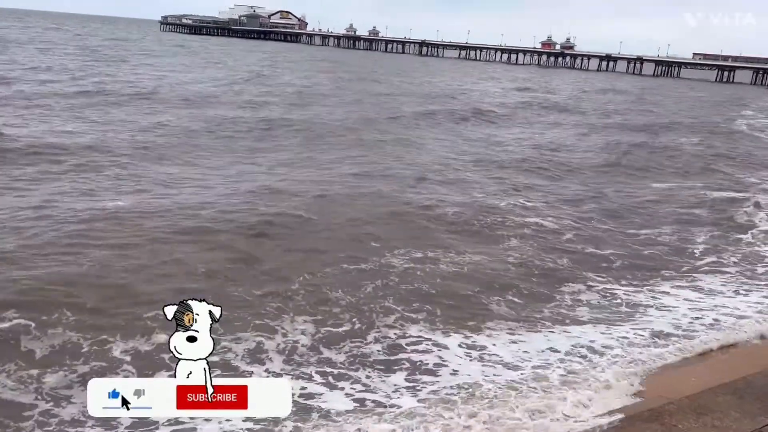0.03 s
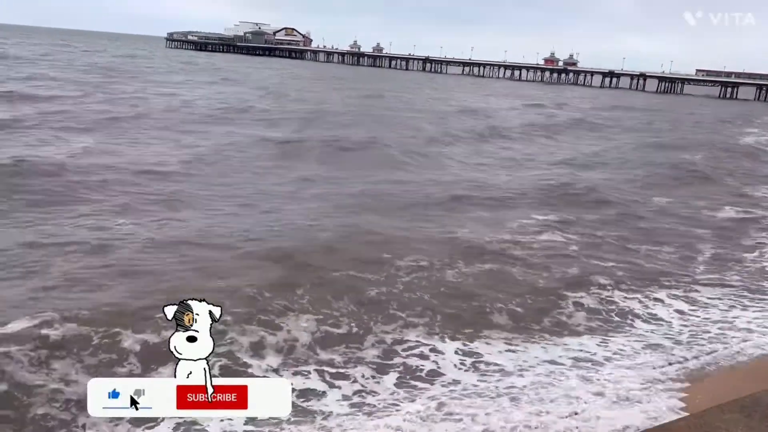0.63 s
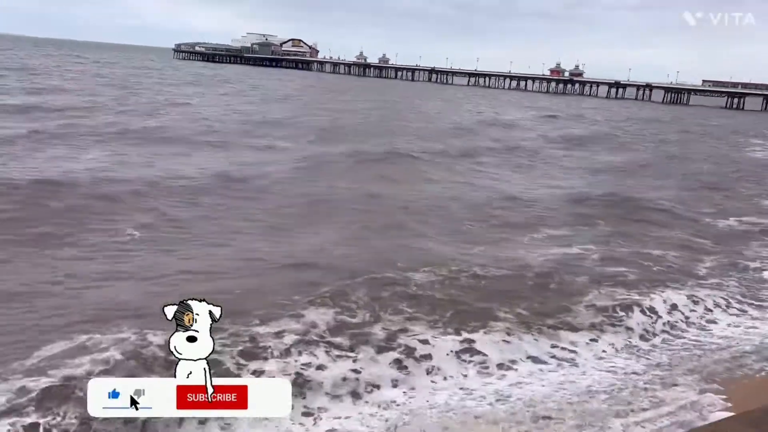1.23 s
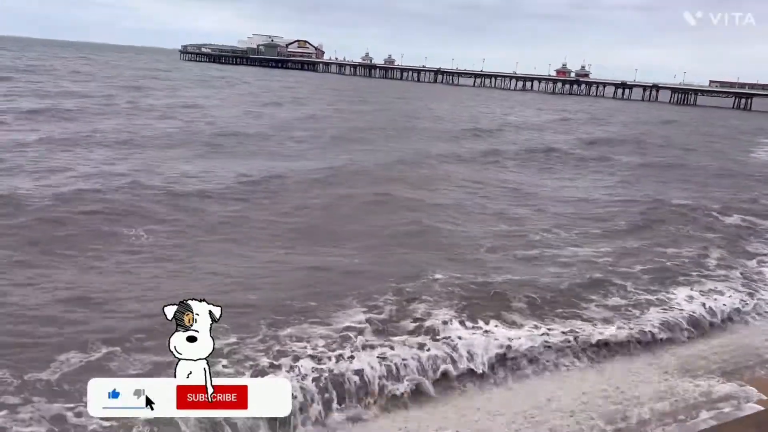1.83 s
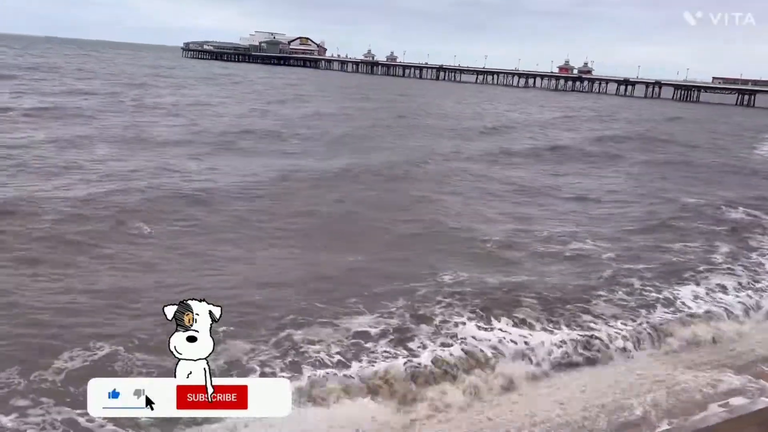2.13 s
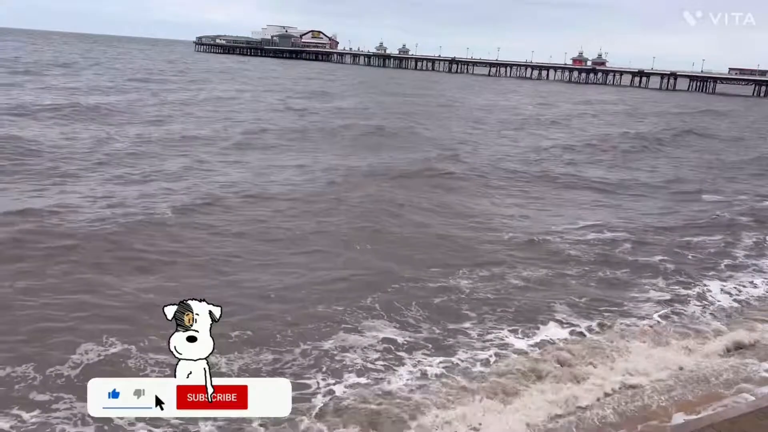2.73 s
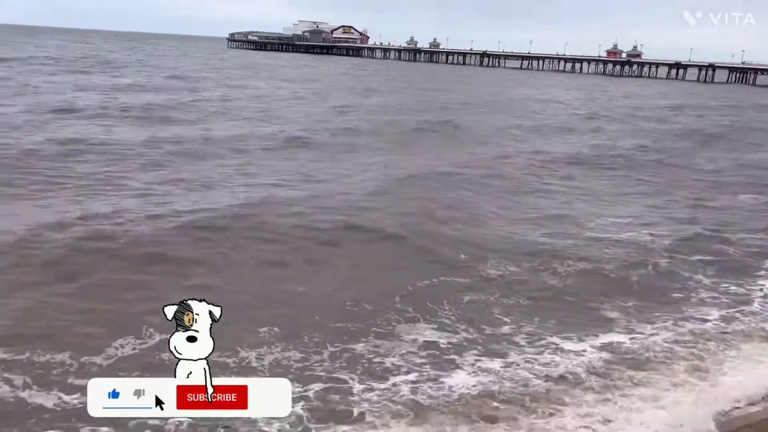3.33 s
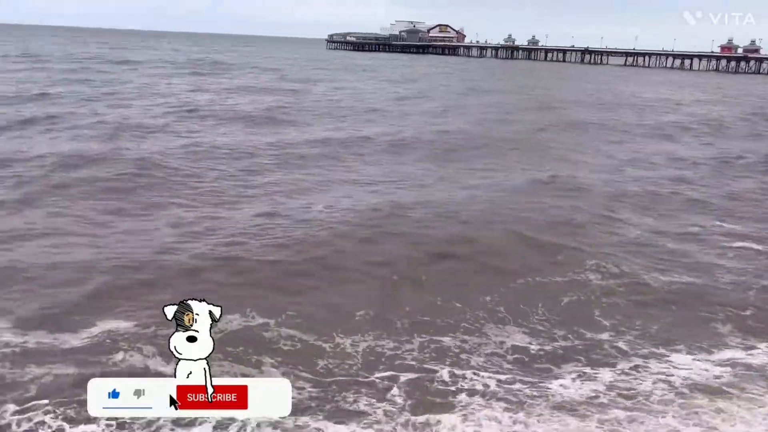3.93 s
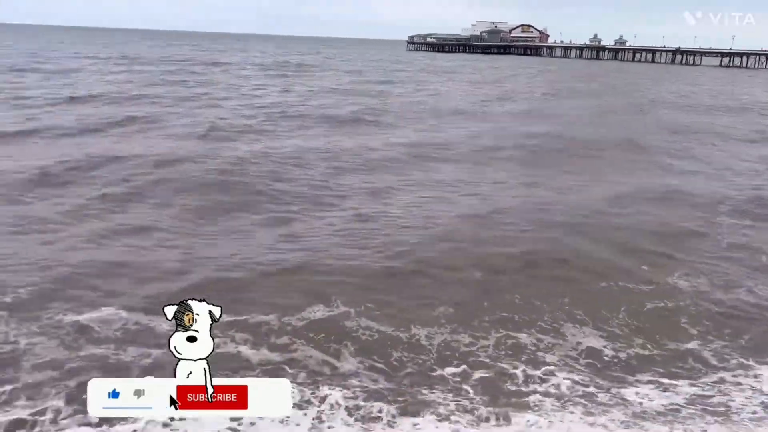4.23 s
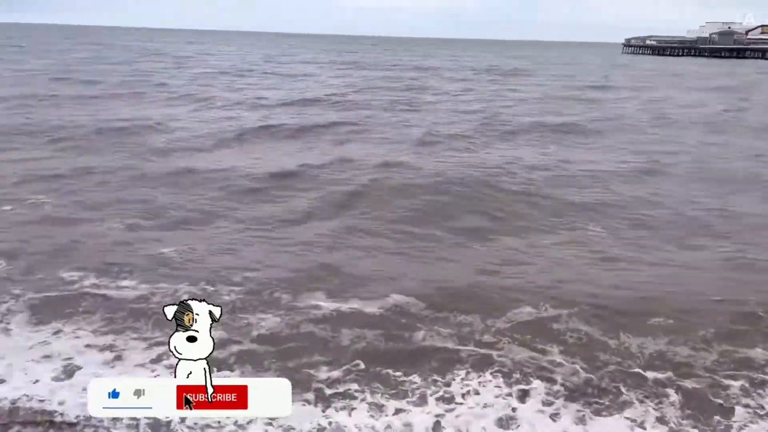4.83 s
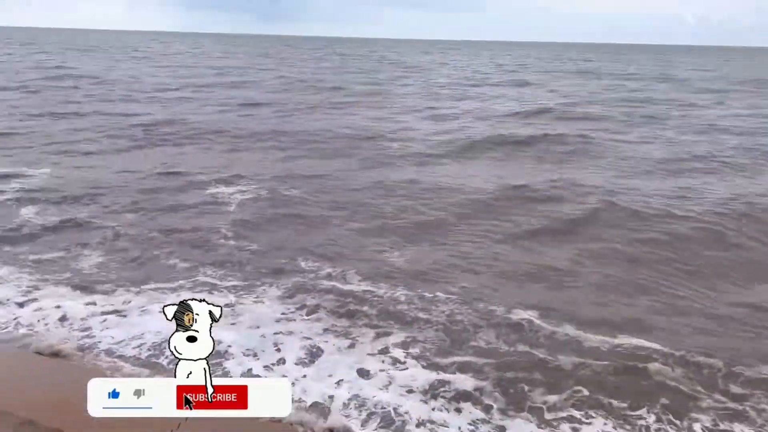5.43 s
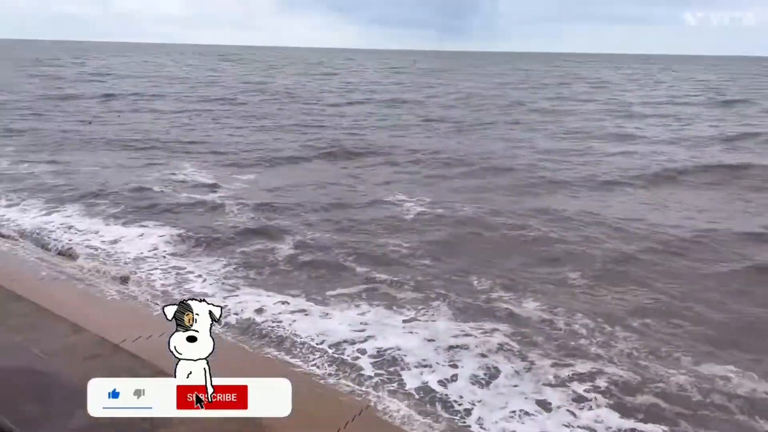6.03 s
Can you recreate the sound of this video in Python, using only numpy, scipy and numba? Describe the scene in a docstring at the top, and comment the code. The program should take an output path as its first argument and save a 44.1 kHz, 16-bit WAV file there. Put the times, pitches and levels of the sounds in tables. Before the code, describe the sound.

A small wave breaks, fizzes and drains on a sandy beach, then wind buffets the microphone hard.

```python
"""On a sandy beach, a small wave spills a few metres away, runs up as foam and drains; the next gathers.
Trapped air pockets gulp, small bubbles ring together as a wash, droplets patter and foam fizzes.
Spent water trickles back through the sand, and surf further off makes a steady rush.
Wind rumbles on a phone's microphones all along and buffets them hard once the wave is spent."""
import sys
import numpy as np
from scipy import signal
from scipy.fft import rfft, irfft, next_fast_len
from scipy.io import wavfile
from scipy.ndimage import uniform_filter1d, map_coordinates
from numba import njit

SR = 44100
rng = np.random.default_rng(int(sys.argv[2]) if len(sys.argv) > 2 else 0)


def wav_out(sig):
    """Save sig, one row per channel (or a flat mono array), as 16-bit PCM at SR to the path in sys.argv[1]."""
    wavfile.write(sys.argv[1], SR, np.round(np.clip(np.atleast_2d(sig).T, -1, 1) * 32767).astype(np.int16))


N = 267687

# Levels are relative. Pan is left minus right. A colour says how strong each pitch is.
# waves: break t/s, tumble/s, white water/dB, trapped air/dB, fizz/dB, spray/dB, starting fizz pan/dB
WAVES = [(-2, 1.3, -52, -25.5, -50, -45, 1), (1.1926, 1.3, -30, -24.5, -37, -41, 6),
         (4.5, 0.87, -37.5, -65, -46.5, -50.5, 1), (6, 1.2, -37.5, -30, -47.5, -43, -6)]
# the biggest air pockets: t/s, level/dB, starting f/Hz, length/s
GULPS = [(1.167, -10, 203, 0.035), (1.208, -18.5, 271.4, 0.24), (1.314, -19.5, 282, 0.14),
         (1.406, -8.5, 325, 0.02), (1.559, -16.5, 198, 0.071), (1.6, -6, 292, 0.022),
         (1.729, -14, 282, 0.099), (1.76, -6, 253, 0.039), (1.835, -16, 276, 0.064),
         (1.885, -15, 284, 0.071), (2.047, -15, 250.4, 0.11), (2.14, -11, 316, 0.017)]
# pitch of the main bubble size in the white water: t/s, f/Hz
BUBBLE_PITCH = [(0, 640), (.8, 610), (1.5, 1090), (2.3, 1690), (3.0, 1710), (3.6, 1190), (5.2, 1570),
                (5.65, 720), (6.07, 700)]
# tongues of water landing: t/s, level/dB, centre f/Hz, length/s
SPLASHES = [(1.889, -31, 1750, 0.062), (2.823, -37.5, 2100, 0.043), (3.281, -39, 1690, 0.042)]
# showers of droplets: t/s, hold/s, level/dB, fade/s
SPATTERS = [(1.85, 0.48, -39.5, .3), (2.83, .025, -45, .025), (3.28, 0.048, -45, .025),
            (5.21, .04, -56, .025)]
# water draining away: t/s, trickle/dB, hiss/dB, pan/dB
BACKWASH = [(0, -68, -80, 15), (3.0, -53.5, -60, 10), (3.65, -62, -59, 9), (4.1, -49.5, -51, 7),
            (5.0, -45.5, -51, 10), (5.4, -46, -52.5, 14), (6.07, -47, -55, 6)]
# gusts, large slow swirls of air: t/s, hold/s, level/dB, part unlike between the microphones/dB
GUSTS = [(0.115, 0.065, -33.5, -6), (.36, 0.22, -40, 3), (0.757, 0.027, -28.5, -1),
         (1.41, 0.033, -26.5, -8), (1.66, 0.08, -24.5, -9), (2.05, 0.35, -32, -11), (2.6, .2, -33, -1),
         (2.92, 0.25, -28.5, 1.5), (3.296, 0.044, -19, -6), (3.465, .1, -21, -5.5),
         (3.73, 0.042, -24.5, -6), (3.942, 0.36, -24, -16), (4.06, .025, -22, -22), (4.44, 0.37, -25, -15),
         (4.57, 0.046, -19.5, -3), (4.94, 0.06, -29.5, -7.5), (5.155, 0.01, -33, -5),
         (5.62, 0.35, -36.5, -9)]
# flurries of small fast swirls: t/s, hold/s, level/dB
FLURRIES = [(3.29, 0.24, -37), (3.94, 0.3, -31), (4.05, 0.0082, -16.5), (4.09, 0.033, -27),
            (4.28, 0.039, -31), (4.51, 0.345, -26), (4.555, 0.087, -21), (4.89, 0.038, -25)]
# single swirls that slap the microphones: t/s, level/dB, starting f/Hz, length/s
BUFFETS = [(2.996, -14, 483, 0.018), (3.14, -22, 700, 0.0092), (3.276, -11.5, 430, .02),
           (3.387, -17, 200, 0.016), (3.415, -14, 260, 0.0091), (3.466, -15.5, 634, 0.0096),
           (3.483, -13, 261, 0.0087), (3.501, -15, 707, 0.018), (3.611, -10.5, 350, 0.0088),
           (3.688, -17.5, 220, 0.012), (3.75, -14.5, 591, 0.02), (3.781, -13, 473, 0.0084),
           (3.81, -21, 396, 0.0091), (3.842, -19, 235, 0.016), (3.898, -8, 867, 0.0098),
           (3.937, -13, 866, 0.0091), (3.962, -13, 855, 0.0098), (3.999, -12, 1010, 0.0061),
           (4.025, -12.5, 3400, 0.0021), (4.027, -10, 760, 0.0053), (4.048, -14.5, 2590, 0.0042),
           (4.053, -9.5, 776, 0.013), (4.188, -14, 698, 0.014), (4.191, -21, 2044, 0.0079),
           (4.368, -13.5, 330, 0.0046), (4.425, -19.5, 1240, 0.0066), (4.435, -9.5, 597, 0.0085),
           (4.466, -20, 2430, 0.0023), (4.468, -12.5, 520, 0.0048), (4.491, -14, 915, 0.006),
           (4.512, -15.5, 1293, 0.011), (4.562, -10, 700, 0.006), (4.578, -12.5, 1496, 0.008),
           (4.603, -16.5, 1700, 0.0052), (4.652, -8.5, 563, 0.0083), (4.688, -12.5, 780, 0.0079),
           (4.713, -8.5, 840, 0.003), (4.754, -13.5, 640, .005), (4.804, -13.5, 710, 0.0057),
           (4.856, -15, 860, 0.0048), (5.569, -24, 557, 0.01), (5.654, -24, 754, 0.011),
           (5.744, -20.5, 513, 0.017), (5.85, -24, 300, 0.0064)]

# colours of the water sounds: f/Hz, level/dB
PLUNGE_COLOUR = [(70, -12), (150, -3.5), (270, 1), (420, -4), (700, -11), (1300, -0.5), (3000, -57)]
WASH_COLOUR = [(250, -4), (550, 1.5), (900, -2.5), (1350, -0.5), (2000, -5), (3000, -16), (6000, -58)]
FIZZ_COLOUR = [(900, -45), (1700, -5.5), (2400, -1.5), (3300, -4.5), (4500, -7), (6000, -9.5),
               (8000, -17.5), (15000, -63)]
SPRAY_COLOUR = [(3000, -8), (6000, -4.5), (7300, -1.5), (8500, 2.5), (9500, -3.5), (10600, -5.5),
                (11700, 2.5), (13000, -3), (15500, -2.5)]
SPATTER_COLOUR = [(2000, -16), (4000, -3), (6000, -1.5), (8300, 2), (11000, -5.5), (15000, -1)]
TRICKLE_COLOUR = [(800, -20), (1350, 5), (2300, -23), (3200, -6), (3900, -9), (4700, -16), (7200, -19),
                  (15000, -60)]
SAND_COLOUR = [(3500, -26), (4900, -5), (5400, -0.5), (6300, 0.5), (7200, -4), (9000, -22), (15000, -52)]
FAR_SURF_COLOUR = [(100, -6.5), (300, 0.5), (550, -5.5), (900, -11), (1600, -15.5), (2400, -14.5),
                   (3200, -32), (5000, -35), (15000, -51)]
# colours of the wind sounds: f/Hz, level/dB
RUMBLE_COLOUR = [(15, -34), (30, -28), (50, -1.5), (75, -0.5), (120, -3), (180, -12), (300, -19),
                 (700, -34), (2000, -110)]
FLUTTER_COLOUR = [(70, -28), (170, 5), (300, -1), (550, -2), (850, -18), (1400, -60), (2400, -56),
                  (5000, -73)]
RASP_COLOUR = [(250, -21), (600, 10.5), (1150, 0.5), (1800, -5), (2600, -22), (5000, -68)]
# small swirls differ most between the microphones: f/Hz, level/dB
ACROSS_TILT = [(30, -6), (70, -2), (160, 2), (400, 4.5)]

# how alike left and right are: f/Hz, likeness from 0 to 1
SEA_LIKENESS = [(100, 0.52), (300, 0.66), (700, 0.65), (1000, 0.56), (1350, 0.6), (1900, 0.3), (2450, 0.7),
                (3300, 0.5), (4500, 0.67), (5500, 0.19), (6300, .28), (7300, 0.98), (8600, 0.59), (9400, 1),
                (10700, 1), (11700, 0.59), (13400, 0.99), (15300, .55)]
WIND_LIKENESS = [(50, 0.66), (150, 0.96), (400, 0.85), (1200, 0.38)]
# how much more the left microphone picks up: f/Hz, pan/dB
SEA_BALANCE = [(400, 0.6), (700, -1.5), (1500, .3), (2200, -1.7), (3000, 1.2), (4200, -1.4), (5500, 1),
               (7000, -1.7), (9000, 0)]
WIND_BALANCE = [(550, 0.5), (900, 6), (2500, 1)]
# how much sooner the loudest surf reaches the left microphone: t/s, lead/ms
SURF_LEAD = [(0, .39), (.4, 0.37), (.9, 0.18), (1.5, 0.11), (2.2, -0.026), (2.8, 0.0017), (3.5, -0.31),
             (4.3, -0.15), (5.1, -0.23), (5.6, -0.37), (6.07, -0.36)]
# a steady phase shift between left and right at high pitches: f/Hz, left lead/radians
TREBLE_PHASE = [(2200, -.35), (3100, .8), (4800, .7), (6000, -.2), (7300, -.05), (8400, -1.15), (9250, -3),
                (10800, -3.3), (11700, -4.85), (12600, -6.2), (14300, -6.35), (15400, -8.7)]

OPPOSITE = np.array([[1], [-1]])  # adds an "across" sound on the left, takes it away on the right


def plunge(tumble_share=0.85):
    """Large pockets of air rumble under the falling crest, mostly in the first part of the tumble."""
    pockets = bubbles(per_s=420, low_hz=126.7, high_hz=764, cycles=16.7,
                      spread_db=2.5, glide=0.19, churn_db=-6.5)
    gain = together(undb(air_db) * surge(s, tumble_share * lasts, rise_db_per_s=20, fall_db_per_s=7)
                    for s, lasts, _, air_db, *_ in WAVES)
    return at_mics(pockets, PLUNGE_COLOUR, SEA_LIKENESS) * gain * undb(0.5 * wander(14))


def gulps(glide=0.28):
    """The biggest air pockets ring out above the rest, rising in pitch."""
    s, db, hz, length = np.transpose(GULPS)
    rung = ring((s * SR).astype(np.int64), hz * 1., length * hz, undb(db + 0.5), glide)
    # a pocket takes a cycle or so to pinch off, which softens its start
    return signal.sosfilt(signal.butter(2, [140, 480], "band", fs=SR, output="sos"), rung)


def wash(crowd_db=1.0, lag_s=0.014):
    """White water: a swarm of small bubbles, crowding round one size, comes in uneven sloshes."""
    swarm = bubbles(per_s=2200, low_hz=451.6, high_hz=4015, cycles=34,
                    spread_db=2.0, glide=0.14, churn_db=9.0)
    water = at_mics(swarm, WASH_COLOUR, SEA_LIKENESS)
    crowd = np.array([band(side, curve(BUBBLE_PITCH), 1.0) for side in water])
    gain = together(undb(water_db) * surge(s + lag_s, lasts, rise_db_per_s=10.5, fall_db_per_s=11.5)
                    for s, lasts, water_db, *_ in WAVES)
    return unit(water + undb(crowd_db) * crowd) * gain * undb(0.84 * wander(22.67))


def foam(spray_lag_s=0.051, peel_db_per_s=3):
    """Foam fizzes over the sand with each wave, and its thinnest films burst as a fine hiss."""
    t = np.arange(N) / SR
    fizz_gains, spray_gains = [], []
    for s, lasts, _, _, fizz_db, spray_db, start_pan_db in WAVES:
        # the break travels along the crest from left to right
        pan_db = start_pan_db - peel_db_per_s * np.clip(t - s, 0, lasts)
        fizz_gains.append(undb(fizz_db + OPPOSITE * pan_db / 2) * foaming(s, lasts))
        spray_gains.append(undb(spray_db) * foaming(s + spray_lag_s, lasts))
    froth = bubbles(per_s=5000, low_hz=1529, high_hz=9190, cycles=29,
                    spread_db=0.5, glide=0.054, churn_db=6.0)
    films = bubbles(per_s=7000, low_hz=5000, high_hz=17100, cycles=25,
                    spread_db=-0.5, glide=.05, churn_db=6.0)
    froth = patchy(froth, depth_db=2.0, patch_hz=179, patch_s=.06)
    films = patchy(films, depth_db=3.0, patch_hz=131.1, patch_s=.06)
    fizz = at_mics(froth, FIZZ_COLOUR, SEA_LIKENESS) * together(fizz_gains) * undb(0.48 * wander(27.04))
    spray = at_mics(films, SPRAY_COLOUR, SEA_LIKENESS) * together(spray_gains) * undb(0.84 * wander(35))
    return fizz + spray


def splashes(width=0.8, across_db=-5):
    """A sheet of water lands, throws up a burst of droplets and dies away."""
    out = np.zeros((2, N))
    t = np.arange(SR // 4) / SR
    for s, db, hz, length in SPLASHES:
        centre = np.full(len(t), float(hz))
        noises = rng.standard_normal((2, len(t)))
        shared, across = (unit(band(band(noise, centre, width), centre, width)) for noise in noises)
        burst = undb(db) * (shared + undb(across_db) * across * OPPOSITE) * pulse(t / length)
        start = int(s * SR)
        out[:, start:start + len(t)] += burst[:, :N - start]
    return out


def spatter(attack_s=0.021):
    """Thrown droplets rain back on the water as a bright patter."""
    drops = bubbles(per_s=4100, low_hz=2940, high_hz=15400, cycles=33,
                    spread_db=-0.5, glide=.05, churn_db=-1)
    gain = together(puff(s, holds, db, attack_s, fade_s) for s, holds, db, fade_s in SPATTERS)
    return at_mics(drops, SPATTER_COLOUR, SEA_LIKENESS) * gain


def backwash():
    """The spent wave trickles back down the beach and hisses through the coarse sand."""
    swarm = bubbles(per_s=2700, low_hz=964, high_hz=8190, cycles=144,
                    spread_db=4.0, glide=0.042, churn_db=10.0)
    swarm = patchy(swarm, depth_db=3, patch_hz=168.5, patch_s=.07)
    trickle = at_mics(swarm, TRICKLE_COLOUR, SEA_LIKENESS) * undb(curve(BACKWASH))
    sand = patchy(rng.standard_normal((2, N)), depth_db=3.5, patch_hz=222, patch_s=.08)
    hiss = at_mics(sand, SAND_COLOUR, SEA_LIKENESS) * undb(curve(BACKWASH, column=2))
    pan_db = curve(BACKWASH, column=3)
    return (trickle + hiss) * undb(0.28 * wander(12) + OPPOSITE * pan_db / 2)


def rumble(breeze_db=-37, breeze_across_db=-6):
    """Breeze and gusts press on both microphones at once; smaller swirls strike each differently."""
    size = next_fast_len(N)
    pressure = rng.standard_normal((2, N)) * undb(2.04 * wander(60))
    colours = np.array([over_hz(RUMBLE_COLOUR), over_hz(RUMBLE_COLOUR) + over_hz(ACROSS_TILT)])
    shared, across = unit(irfft(rfft(pressure, size) * undb(colours), size)[:, :N])
    gusts = [puff(s, holds, db, attack_s=0.057, fade_s=0.15) for s, holds, db, _ in GUSTS]
    gusts_across = [gust * undb(across_db) for gust, (*_, across_db) in zip(gusts, GUSTS)]
    shared_gain = together([undb(breeze_db)] + gusts)
    across_gain = together([undb(breeze_db + breeze_across_db)] + gusts_across)
    return shared * shared_gain + across * across_gain * OPPOSITE


def flurries(ragged_db=1.56, rasp_db=-24, rasp_growth=1.06):
    """Small fast swirls of air add a ragged flutter, and a rasp that grows with their strength."""
    ragged = undb(ragged_db * wander(220))
    flutter = at_mics(rng.standard_normal((2, N)) * ragged, FLUTTER_COLOUR, WIND_LIKENESS)
    rasp = at_mics(rng.standard_normal((2, N)) * ragged, RASP_COLOUR, WIND_LIKENESS)
    strength = together(puff(*flurry, attack_s=0.02, fade_s=0.0083) for flurry in FLURRIES)
    return flutter * strength + rasp * undb(rasp_db) * (strength / strength.max()) ** rasp_growth


def buffets(slowing=0.7, swing_db=-4, across_db=-9):
    """A swirl of air strikes sharply, then its ragged pressure swings slow down and die away."""
    out = np.zeros((2, N))
    t = np.arange(SR // 8) / SR
    for s, db, hz, length in BUFFETS:
        age = t / length
        turns = hz * length / slowing * np.log1p(slowing * age)
        # two random pressures a turn, passing ever more slowly
        shared, across = (map_coordinates(row, [2 * turns], order=3, mode="mirror")
                          for row in rng.standard_normal((2, 256)))
        pressure = shared + undb(swing_db) * np.sin(np.pi * turns) + undb(across_db) * across * OPPOSITE
        envelope = pulse(age)
        blow = undb(db) * unit(pressure * envelope) * np.sqrt(np.mean(envelope ** 2))
        start = int(s * SR)
        out[:, start:start + len(t)] += blow[:, :N - start]
    return out


def far_surf(level_db=-40):
    """Surf further along the beach blurs into a steady rush."""
    rush = at_mics(rng.standard_normal((2, N)), FAR_SURF_COLOUR, SEA_LIKENESS)
    return rush * undb(level_db + 0.56 * wander(5.5))


def bubbles(per_s, low_hz, high_hz, cycles, spread_db, glide, churn_db):
    """Two unrelated swarms of bubbles of mixed strength, over the noise of churning water."""
    swarms = []
    for seed in rng.integers(2 ** 30, size=2):
        when, pitch, life, faintness = np.random.default_rng(seed).random((int(per_s * N / SR), 4)).T
        hz = low_hz * (high_hz / low_hz) ** pitch
        gain = undb(-spread_db * np.log(np.maximum(faintness, np.exp(-4)))) * np.sqrt(hz)
        swarms.append(unit(ring((when * N).astype(np.int64), hz, cycles * (.5 + life), gain, glide)))
    return np.array(swarms) + undb(churn_db) * rng.standard_normal((2, N))


@njit
def ring(start, hz, cycles, gain, glide):
    """Each bubble is a fading tone that climbs in pitch as it nears the surface."""
    out = np.zeros(N)
    for k in range(len(start)):
        life, phase = cycles[k] * SR / hz[k], 0.
        for i in range(min(int(life), N - start[k])):
            phase += 2 * np.pi * hz[k] / SR * (1 + glide * i / life)
            out[start[k] + i] += gain[k] * np.exp(-5 * i / life) * np.sin(phase)
    return out


def patchy(pair, depth_db, patch_hz, patch_s):
    """Bubbles burst in clusters of like size, so narrow ranges of pitch swell and fade at random."""
    hz, t, cells = signal.stft(pair, SR, nperseg=1024)
    grid = np.meshgrid(hz / patch_hz, t / patch_s, indexing="ij")
    swell = map_coordinates(rng.standard_normal((256, 256)), grid, mode="mirror")
    return unit(signal.istft(cells * undb(depth_db * swell), SR)[1][:, :N])


def surge(breaks, lasts, rise_db_per_s, fall_db_per_s, crest_db=0.93):
    """Loudness of one wave: it builds to the break, swells as it tumbles, then falls at the set rate."""
    age = np.arange(N) / SR - breaks
    crest = crest_db * np.sin(np.pi * np.clip(age / lasts, 0, 1))
    return undb(crest - rise_db_per_s * np.maximum(-age, 0) - fall_db_per_s * np.maximum(age - lasts, 0))


def foaming(breaks, lasts, linger_db=-11):
    """Loudness of one wave's foam: most bursts as the wave runs up, the rest fizzes on steadily."""
    bursting = surge(breaks, lasts, rise_db_per_s=15, fall_db_per_s=16)
    lingering = undb(linger_db) * surge(breaks, lasts, rise_db_per_s=15, fall_db_per_s=0)
    return together([bursting, lingering])


def puff(s, holds, db, attack_s, fade_s):
    """Loudness of one gust or shower: it rises, holds and fades."""
    t = np.arange(N) / SR
    return undb(db) * np.exp(-np.maximum(s - t, 0) / attack_s - np.maximum(t - s - holds, 0) / fade_s)


def pulse(age):
    """A quick rise to 1 at age 0.5, then a slower fade."""
    return 2 * age * np.exp(1 - 2 * age)


def at_mics(pair, colour, likeness):
    """Colour two unrelated sounds and blend them into a partly alike left and right."""
    size = next_fast_len(N)
    mid, side = rfft(pair, size) * undb(over_hz(colour))
    alike = np.clip(over_hz(likeness), 0, .96)
    mid, side = mid * np.sqrt(1 + alike), side * np.sqrt(1 - alike)
    return unit(irfft(np.array([mid + side, mid - side]), size)[:, :N])


def travel(pair, treble_above_hz=2136):
    """Surf reaches the nearer microphone first, so it moves across as the break runs along the beach."""
    hz, t, cells = signal.stft(pair, SR, nperseg=1024)
    lead_s = np.interp(t, *np.transpose(SURF_LEAD)) / 1000
    treble = np.interp(hz, *np.transpose(TREBLE_PHASE))
    phase = np.where(hz[:, None] < treble_above_hz, 2 * np.pi * np.outer(hz, lead_s), treble[:, None])
    return signal.istft(cells * np.exp(.5j * np.array([phase, -phase])), SR)[1][:, :N]


def lean(pair, balance):
    """Tip each range of pitch towards one microphone."""
    size = next_fast_len(N)
    return irfft(rfft(pair, size) * undb(over_hz(balance) * OPPOSITE / 2), size)[:, :N]


@njit
def band(x, hz, width):
    """Keep the pitches near a centre that can move; width is a share of that centre."""
    out, band_state, low_state = np.empty(len(x)), 0., 0.
    for i in range(len(x)):
        tuning = np.tan(np.pi * hz[i] / SR)
        passed = (band_state + tuning * (x[i] - low_state)) / (1 + tuning * (tuning + width))
        band_state = 2 * passed - band_state
        low_state += 2 * tuning * passed
        out[i] = width * passed
    return out


def wander(rate):
    """A smooth random wobble that changes about rate times a second."""
    step = max(int(SR / rate), 1)
    stairs = np.repeat(rng.standard_normal(N // step + 2), step)
    return unit(uniform_filter1d(stairs, step)[step // 2:step // 2 + N])


def curve(rows, column=1):
    """One column of a table, joined by straight lines in time."""
    rows = np.array(rows)
    return np.interp(np.arange(N) / SR, rows[:, 0], rows[:, column])


def over_hz(points):
    """A table read at every frequency, with octaves evenly spaced."""
    hz, value = np.transpose(points)
    return np.interp(np.log(np.fft.rfftfreq(next_fast_len(N), 1 / SR) + 1), np.log(hz), value)


def together(gains):
    """Unrelated sounds add in power."""
    return np.sqrt(sum(gain ** 2 for gain in gains))


def undb(db):
    """Turn decibels into a multiplier."""
    return 10 ** (np.asarray(db) / 20)


def unit(x):
    """Scale to an average power of 1."""
    return x / np.sqrt(np.mean(x ** 2))


def scene():
    """The surf with the wind on top."""
    surf = plunge() + gulps() + wash() + splashes() + spatter() + foam() + backwash() + far_surf()
    wind = rumble() + flurries() + undb(-2.55) * buffets()
    return lean(travel(surf), SEA_BALANCE) + lean(wind, WIND_BALANCE)


def record(dry, ceiling=0.9, low_hz=29, top_hz=15600):
    """The phone thins the deepest rumble, rounds the hardest buffets and cuts the highest hiss."""
    thinned = signal.sosfilt(signal.butter(4, low_hz, "high", fs=SR, output="sos"), dry)
    rounded = ceiling * np.tanh(thinned / ceiling)
    return signal.sosfilt(signal.ellip(8, .2, 70, top_hz, fs=SR, output="sos"), rounded)


dry = scene()
out = record(dry)
wav_out(out)
```